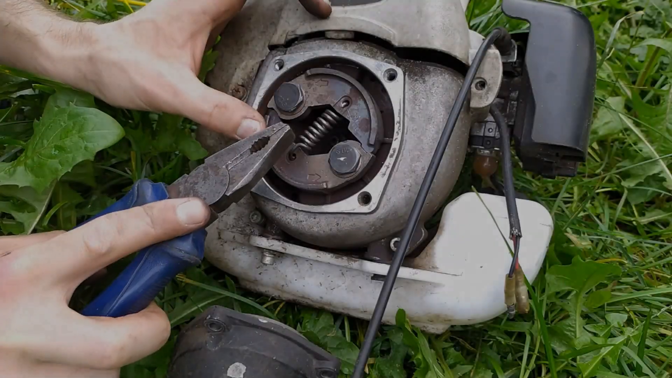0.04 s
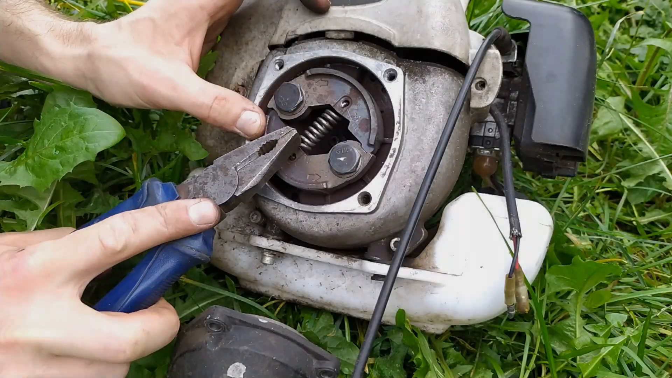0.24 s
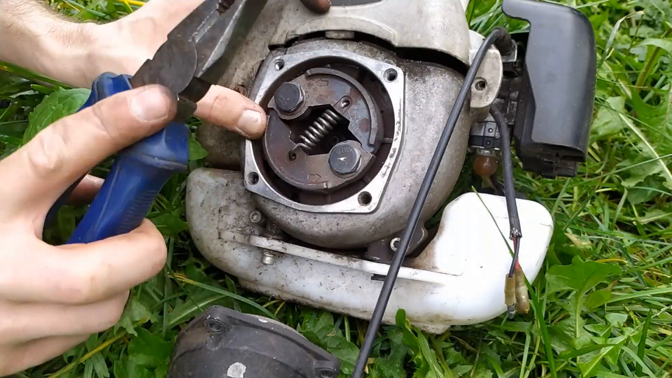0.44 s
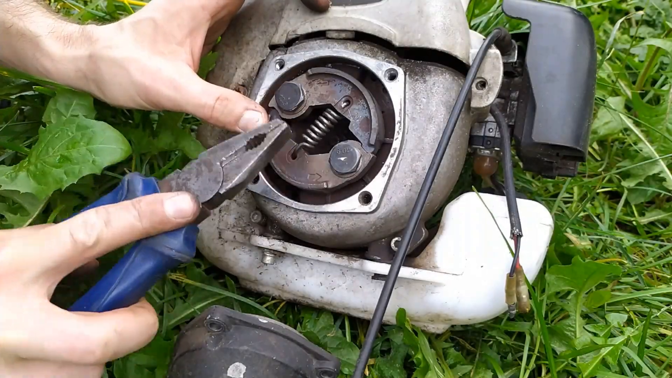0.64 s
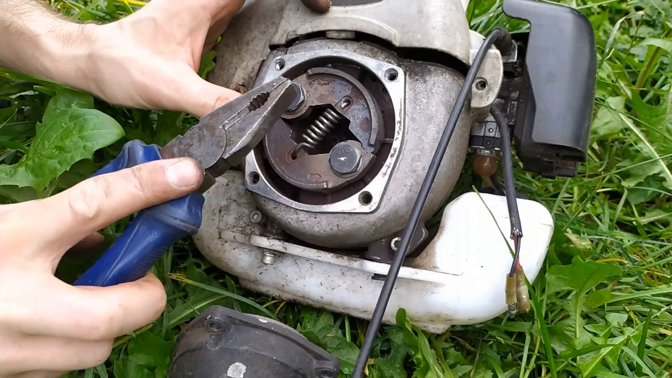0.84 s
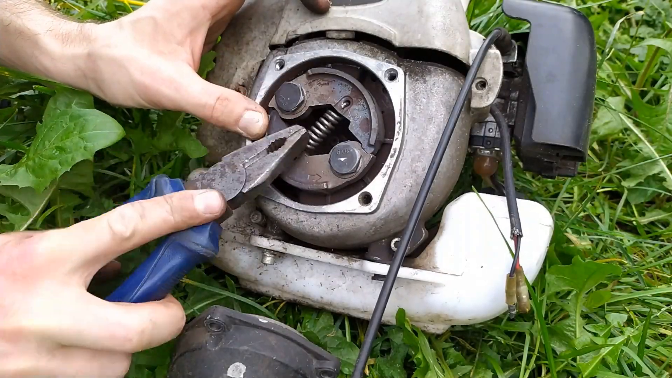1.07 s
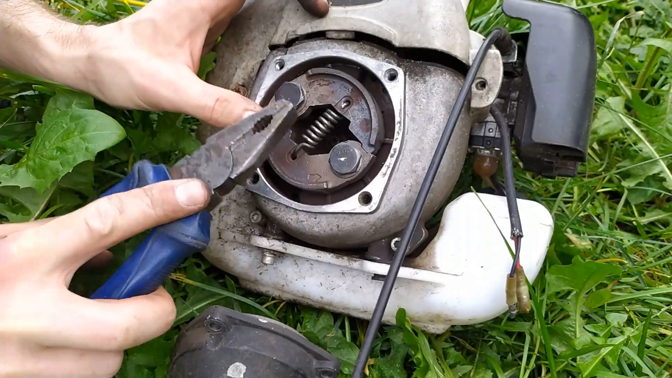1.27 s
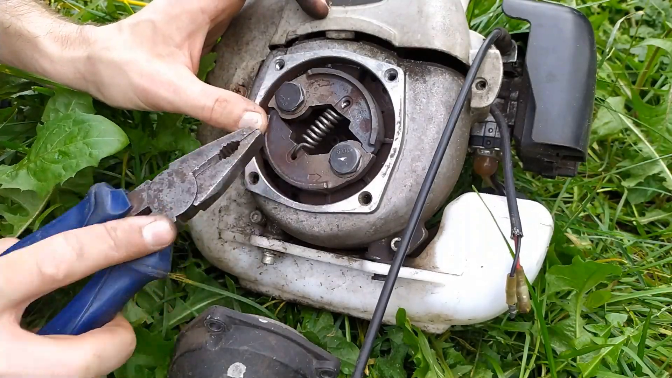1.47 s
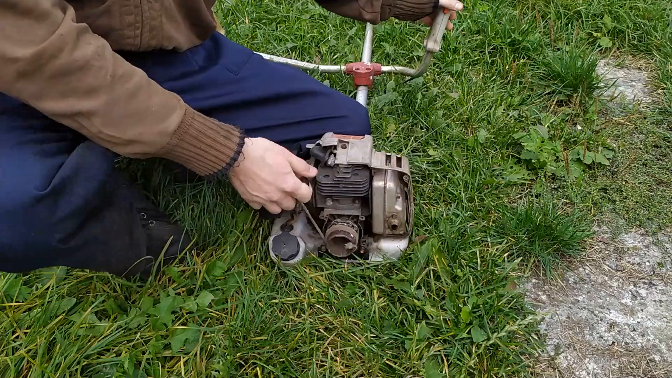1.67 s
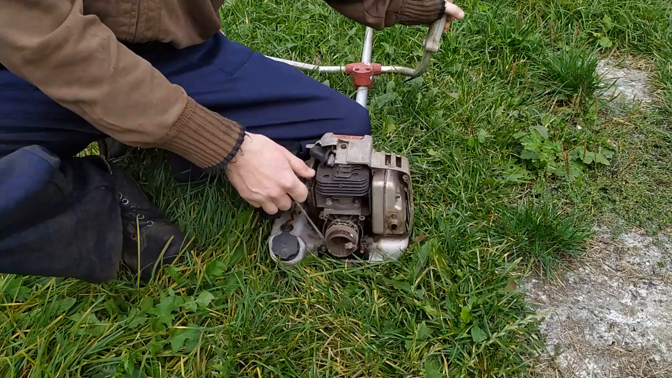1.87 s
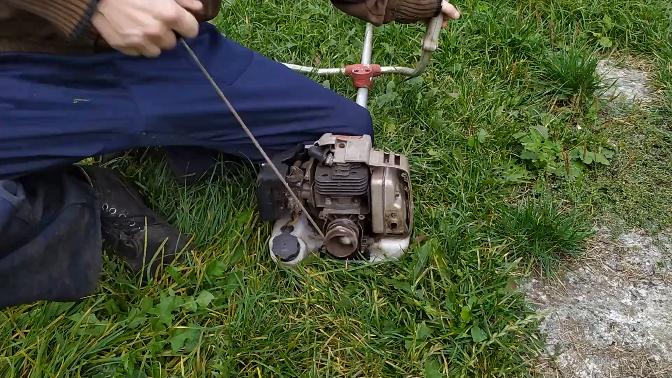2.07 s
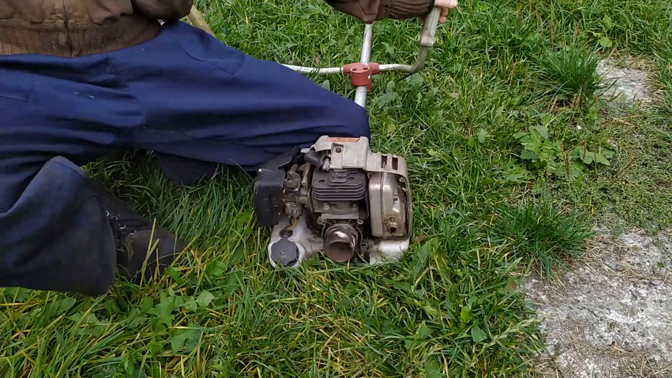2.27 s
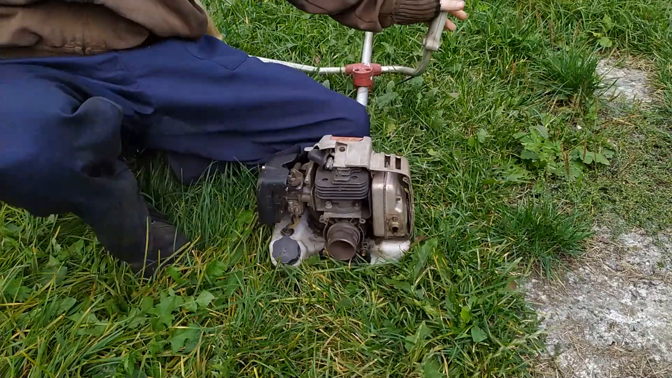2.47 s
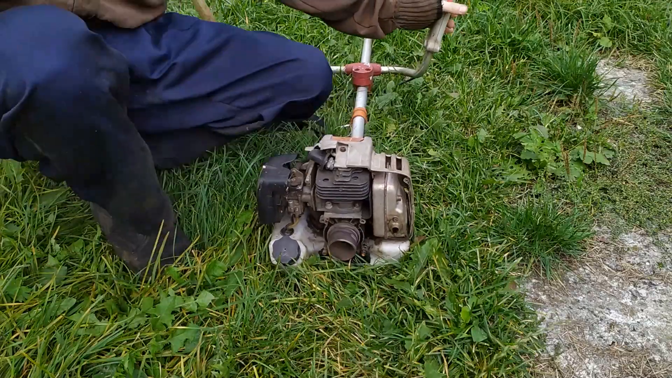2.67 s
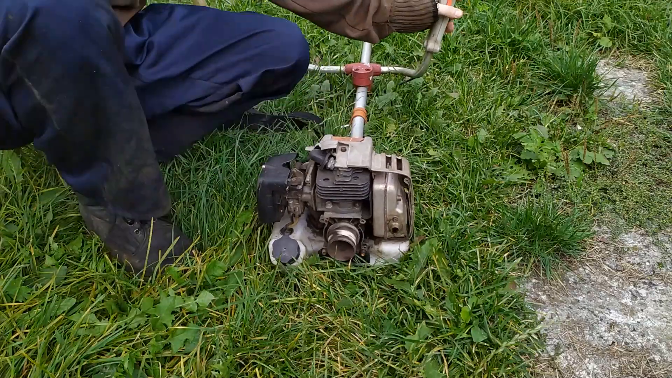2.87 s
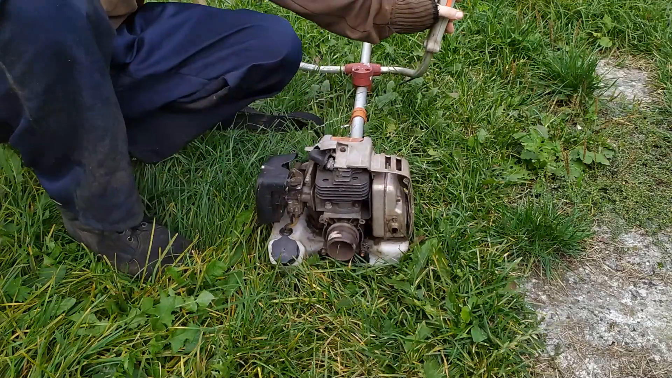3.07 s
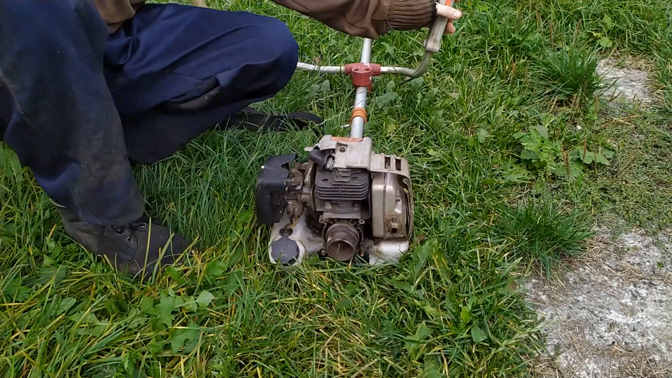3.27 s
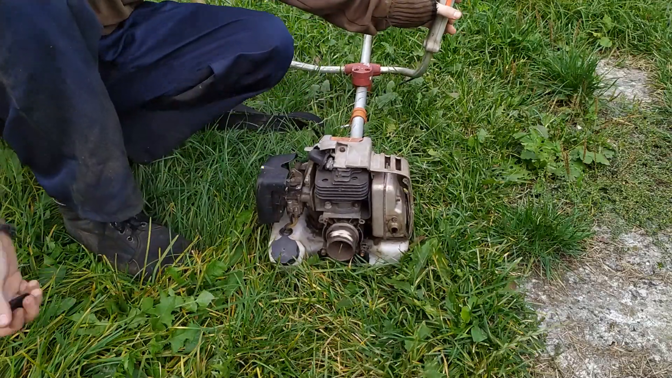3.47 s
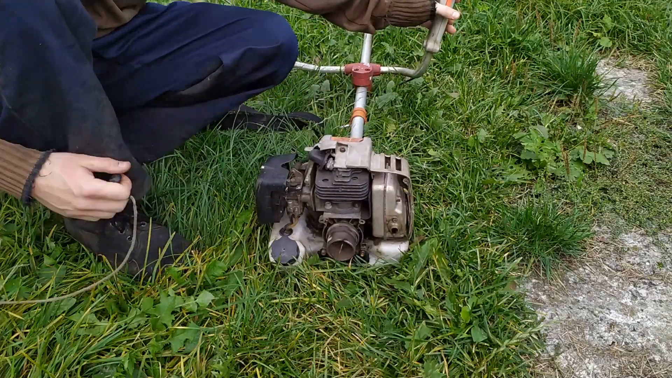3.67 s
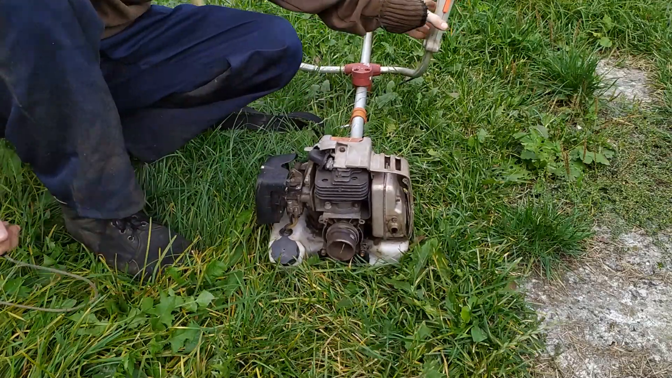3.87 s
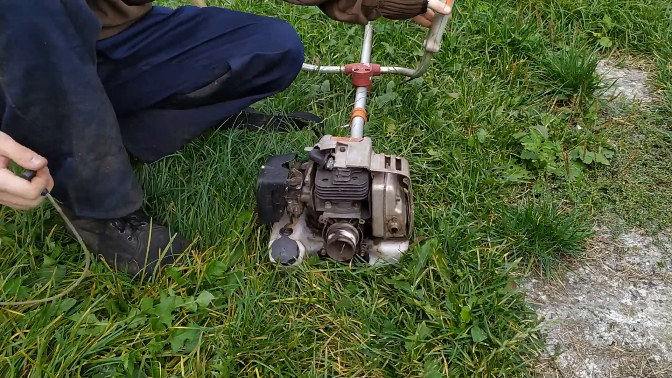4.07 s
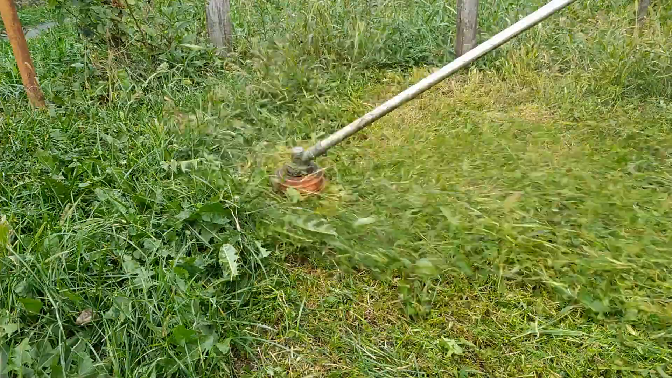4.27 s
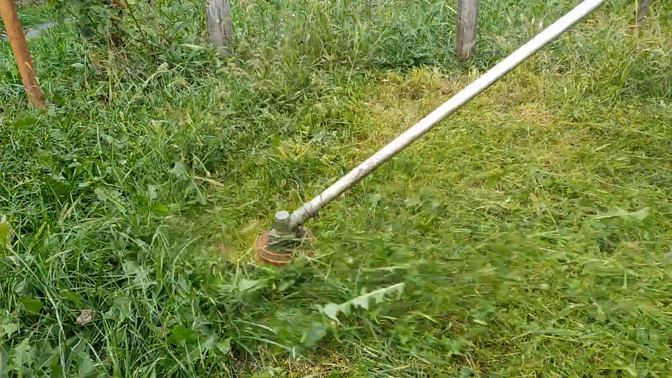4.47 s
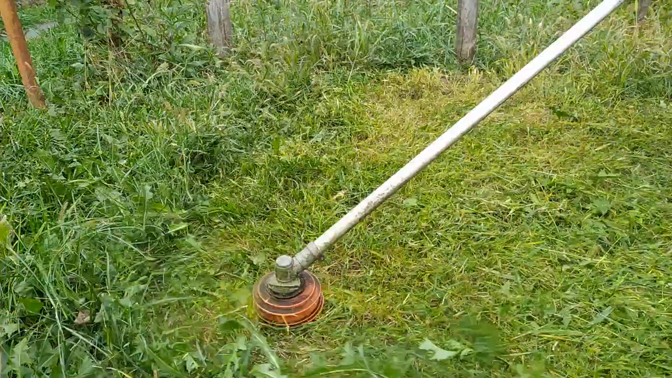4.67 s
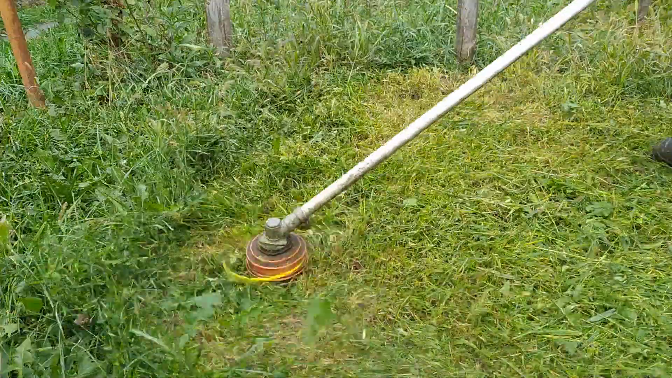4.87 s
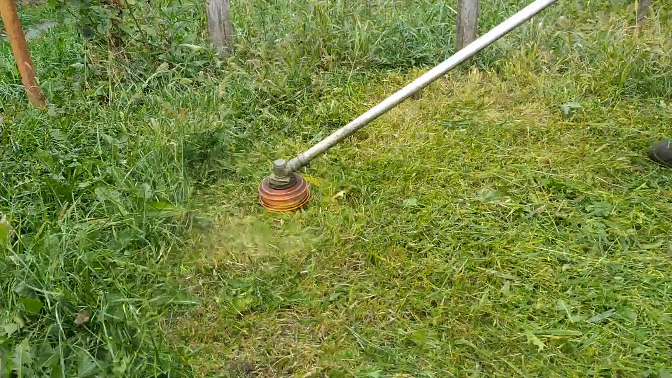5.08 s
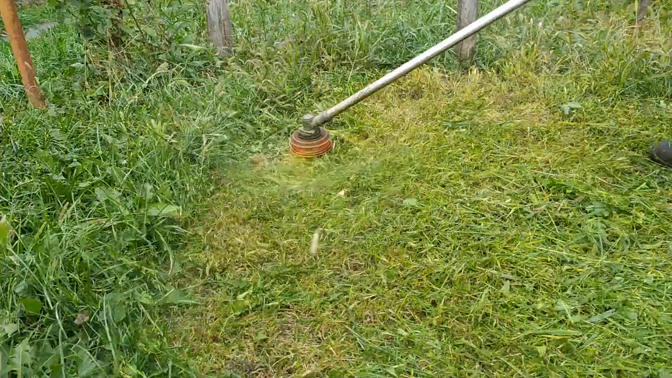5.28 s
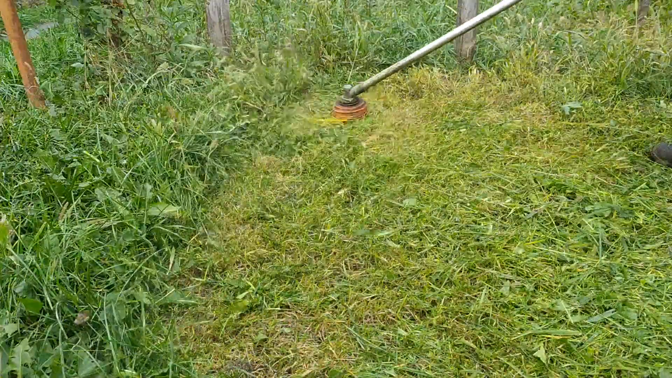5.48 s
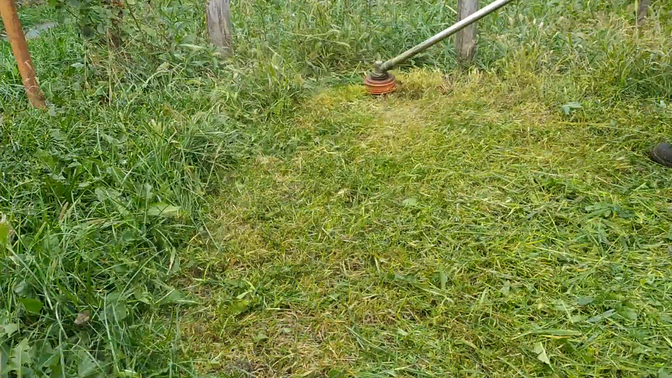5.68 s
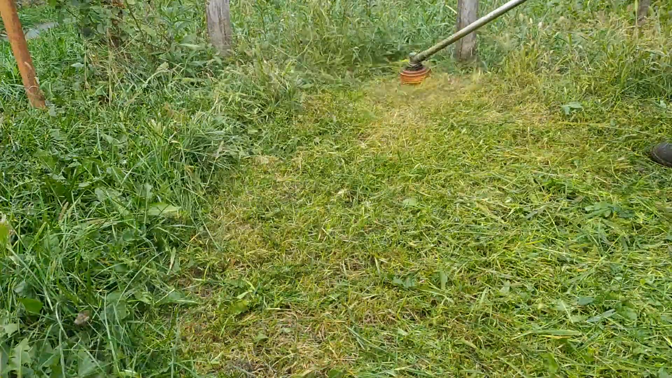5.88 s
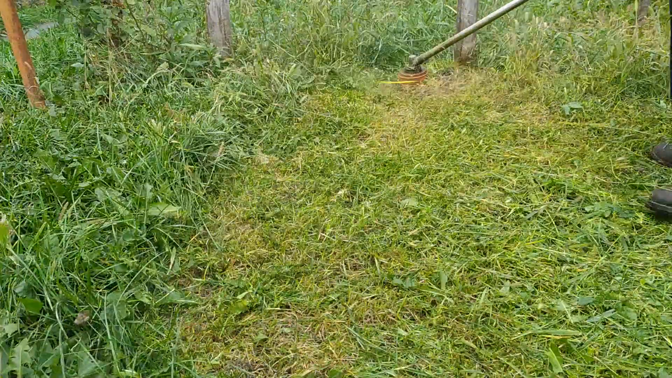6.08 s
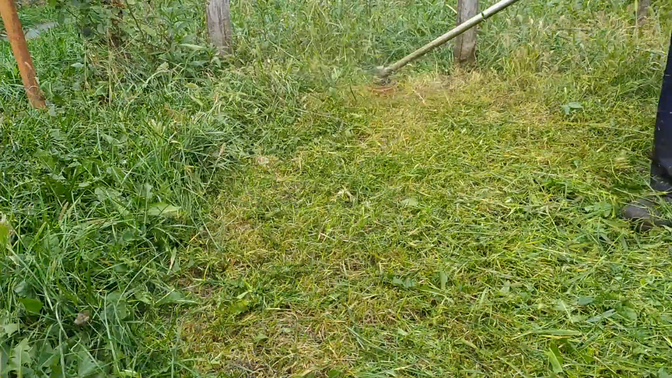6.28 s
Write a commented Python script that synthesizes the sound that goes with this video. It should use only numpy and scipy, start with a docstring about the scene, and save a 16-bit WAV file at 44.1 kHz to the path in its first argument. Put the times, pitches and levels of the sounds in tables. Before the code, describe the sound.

Three dry, open-air moments joined by hard cuts. First, near the microphone, steel clacks and rings as a sprung part snaps back under pliers. Next, a pull cord ratchet clatters and a petrol engine fires, surges briefly, then coasts down through a scraping clutch to a thudding idle with loose metallic rattle. Last, a steady buzzing exhaust drone beneath a wide, bright, fluttering noise of grass being shredded, with plastic guard ticks.

```python
"""A two-stroke engine of a string trimmer: thumps, cracks and rattles timed by its crank, a sum of orders at work.
First pliers lever at its clutch; the sprung shoe snaps back, and struck modes of the steel ring and die.
Then, on a lawn, the engine is pull-started, flares up and settles to an idle that fires every fourth turn.
Last it runs at working speed: the spinning line whirrs and modulates coloured noise as it tears grass."""
import sys
import numpy as np
from scipy import signal
from scipy.fft import rfft, irfft, next_fast_len
from scipy.io import wavfile
from scipy.ndimage import uniform_filter1d

SR = 44100
rng = np.random.default_rng(int(sys.argv[2]) if len(sys.argv) > 2 else 0)


def transcribe(signal):
    """Save signal, clipped to [-1, 1], as a 16-bit WAV file at the path in sys.argv[1]."""
    frames = np.atleast_2d(signal).T
    limited = np.clip(frames, -1, 1)
    pcm = np.round(limited * 32767).astype(np.int16)
    wavfile.write(sys.argv[1], SR, pcm)


N = 279153
T = np.arange(N) / SR  # time in seconds

# Background spectrum of the air. Each row: frequency in Hz, level in dB.
AIR_TONE = [(15, -49), (25, -17), (74, -5.5), (427, -18.5), (624, -21), (734, -20.5), (863, -27.5),
            (1070, -22), (1480, -26.5), (9840, -32.5), (16000, -30)]
AIR_DB = -70
HUM_HZ, HUM_DB = 94, -64
# Stereo width by frequency. Each row: frequency in Hz, side level relative to mid in dB.
WIDTH = [(60, -7), (125, -13), (250, -12.5), (500, -6), (1000, 0), (2000, -1.5), (8000, 0)]
# Narrowing of the start and widening of the mowing. Each row: frequency in Hz, change of the side signal in dB.
START_WIDTH = [(60, 0), (250, -2), (700, -7), (1300, -11.5), (2400, -12), (4400, -2), (8000, -2.5),
               (15000, 2)]
WORK_WIDTH = [(60, 2.5), (250, 2), (700, 2), (1500, 2.5), (2500, 1.5), (5000, 1), (15000, -1)]
LAWN_S, MOWING_S = 1.676, 4.18  # starts of the second and third moments
EDGE_HZ = 15950  # upper band limit

# Snaps of the clutch shoe. Each row: start in seconds, clatter level in dB, clatter decay in seconds, then levels
# in dB of housing knock, crankcase, spring, shoe, pliers, flywheel, pivot bolt and swelling tone,
# delay of its crest in seconds, delay of the rebound in seconds, rebound relative to the clatter in dB.
SNAPS = [(0.2576, -35.5, 0.0056, -36.5, -42, -65.5, -60, -58, -57, -82, -88, .1, 0.0051, -5),
         (0.6436, -9.5, 0.0098, -10.5, -29, -28.5, -28, -36, -35.5, -30.5, -44.5, .11, 0.015, -6.5),
         (1.1812, -13.5, 0.0065, -25, -21, -43, -38, -36, -63, -68.5, -76, .17, 0.019, -9),
         (1.4049, -11.5, 0.0056, -30.5, -35, -39, -50, -28.5, -74, -70, -63.5, .2, 0.0072, -27)]
# Modes of the struck parts. Each row: frequency in Hz, level in dB, 60 dB decay time in seconds.
FLYWHEEL_MODES = [(703, -24, .9), (1206, -15, 0.65), (1458, -7, .95), (1780, -23, 1.3)]
HOUSING_MODES = [(224, -5, 0.084), (278, 1.5, 0.055), (500, -3, 0.029), (660, -7.5, 0.06), (806, 7, 0.02),
                 (896, 6.5, 0.021), (1190, 2, 0.032)]
SPRING_MODES = [(2910, -24, 1.4), (5957, -8, 0.5), (6411, -9, 0.45), (7055, -16, 1.0), (8384, -5.5, .85),
                (8414, -8, .75)]
SHOE_MODES = [(6089, -13, .85), (6158, -9, 0.75), (6718, -12, .28), (6912, 1, .19), (8790, -3, 0.17),
              (11300, -10, .17), (13400, -12, .16)]
PLIERS_MODES = [(3332, -1.5, 0.18), (3402, -17, .28), (4276, -26, 0.6), (5173, -4, .1), (7149, -22, .7),
                (7660, -22, 0.6)]
PIVOT_MODES = [(4840, -4, .15), (6412, 1, .22), (1803, -5, .2)]
PAWL_MODES = [(3230, -6, .15), (3924, 0, .078), (5749, -9, .09), (6939, -15, .11)]
CRANKCASE_MODES = [(1080, -7, .018), (1455, 0, .04), (1720, 2, .016), (2010, -1, .018), (2290, -4, .016),
                   (2850, -7, .018), (6500, -1, .005), (10200, 0, .004)]
STEM_MODES = [(530, -2.3, 0.017), (740, -5, 0.014), (884, 0, 0.023)]
# Cough of the first pull through the silencer. Each row: frequency in Hz, level in dB, 60 dB decay time in seconds.
COUGH_MODES = [(135, -21.5, .085), (200, -28, 0.076)]
COUGH_S = 2.136
# Spectrum of the clatter. Each row: frequency in Hz, level in dB.
CLATTER_TONE = [(200, -1.5), (500, -7), (1000, -11), (1600, -1.5), (2300, -8), (3300, -2), (5200, -7.5),
                (7400, -3.5), (8800, -1), (10800, -13.5), (13500, -7.5), (16000, -19.5)]
CLATTER_PATCHY_DB, CLATTER_UNEVEN_DB = 4.5, 1.8
# A hand shifts on the casing. Each row: time in seconds, level in dB.
HANDLING = [(.36, -88), (.378, -42.5), (.43, -46), (.48, -54), (.55, -59), (.62, -62)]
# Spectrum of the handling. Each row: frequency in Hz, level in dB.
HANDLING_TONE = [(25, -28), (70, 6), (170, -7.5), (300, -13.5), (700, -40), (3000, -50.5), (15000, -49.5)]
# one tone of the steel swells after each snap; each new contact damps what still rings
SWELL_HZ, SWELL_STEEPNESS, CONTACT_DAMP_DB = 4843, 2.6, -18
# the shoe settles in ever weaker taps, relative to the clatter
SETTLE_PER_S, SETTLE_DB, SETTLE_DECAY_S = 130, -23, .028

# Crankshaft speed: pulled over, flaring up, coasting to idle. Each row: time in seconds, turns a second.
CRANK = [(2.13, 27), (2.18, 43.5), (2.33, 44.5), (2.42, 55.6), (2.49, 79.3), (2.55, 91.5), (2.61, 97.3),
         (2.66, 95.9), (2.7, 92.6), (2.76, 86.2), (2.82, 81), (3.0, 68), (3.11, 62.7), (3.36, 58.3),
         (3.62, 54.2), (4.18, 53)]
IDLE_HZ, TURNS_PER_FIRING = 54, 4
TURNING_S, SPIN_UP_S = 2.118, 0.035  # the cord sets the crank turning
# Runs of firings with a stumble between runs. Each row: first and last firing in seconds, thump and crack in dB.
FIRINGS = [(2.17, 2.351, -4, -19.5), (2.82, 2.82, -5.5, -20), (2.962, 3.21, -5, -20),
           (3.2928, 3.8685, -3.8, -21.5), (3.887, 4.037, -6, -22), (4.055, 4.132, -4.5, -21.5)]
THUMP_GAIN_DB, CRACK_GAIN_DB = 0.75, 0.3
# Loose parts clack without a firing. Each row: time in seconds, level in dB.
CLACKS = [(2.408, -21), (2.4427, -17.5), (3.276, -23)]
# Silencer response to a firing, and to unfired charge. Each row: frequency in Hz, level in dB.
THUMP_TONE = [(20, -18), (60, 13.5), (130, 10), (220, 5), (400, -2), (700, -14.5), (1500, -36), (5000, -18)]
PUFF_TONE = [(20, -2), (60, -0.5), (130, 6), (250, 5.5), (450, -4), (800, -18.5), (1500, -40.5),
             (5000, -57)]
PUFF_DB, PUFF_UNDER_FLARE_DB = -23, 1.5  # one puff a turn, stronger during the flare
# The engine shakes most where an order meets its boom. Each row: multiple of crank speed, level in dB, lag in turns.
SHAKE = [(1, -29, 0.71), (2, -32.5, 0.14)]
BOOM_HZ, BOOM_DB_PER_OCTAVE = 97.7, -17
# Rattle of piston and bearings, harder with speed. Each row: frequency in Hz, level in dB.
RATTLE_TONE = [(30, 0), (120, 14.5), (300, 11), (550, 11), (800, 2.5), (1100, 5.5), (1750, 9), (2400, 7),
               (3000, 5), (5000, 2.5), (7000, 3.5), (10000, 1), (12000, -3.5), (16000, -3.5)]
RATTLE_DB, RATTLE_DB_PER_OCTAVE = -34.5, 9
# the piston slaps harder with speed; loose parts tick at random
SLAP_DB, SLAP_DB_PER_OCTAVE, SLAP_UNEVEN_DB = -40, 15, 2.5
TICK_DB, TICK_UNEVEN_DB, TICKS_PER_S = -46, 4, 90

# Overtones of the flare. Each row: multiple of the crank speed, level in dB.
FLARE_ORDERS = [(1, 6.5), (2, -6.5), (3, 1.5), (4, -7), (5, -6), (6, -10), (7, -7.5), (8, -8.5), (9, -16),
                (11, -22), (15, -21), (17, -18), (20, -21), (23, -22), (28, -33)]
FLARE_S, FLARE_RISE_S = 2.36, 0.022  # the starting charge catches
# As the charge runs out the rasp begins a long fade, the overtones drop quickly, then the boom stops;
# the rasp ends last. Each holds: level in dB, end of the hold in seconds, release in seconds.
FLARE_BARK = (-20, 2.635, 0.037)
FLARE_RASP = (-28.5, 2.615, 0.21)
FLARE_BOOM = (-31, 2.69, 0.028)
FLARE_DB_PER_OCTAVE = 7.5  # the boom grows with speed
# Spectrum of the rasping gas. Each row: frequency in Hz, level in dB.
RASP_TONE = [(100, -2), (700, -3), (1500, -12), (4500, -3), (6800, 3), (8500, -2.5), (10000, 1.5),
             (12000, -4.5), (16000, -6.5)]
# Silencer resonances. Each row: frequency in Hz, width in Hz, gain in dB.
SILENCER = [(620, 47, 1), (704, 30, -0.5), (1410, 34, -8), (1820, 150, -35)]

# Pawls of the pull starter catch and clatter. Each row: time in seconds, level in dB, decay in seconds.
PAWLS = [(1.939, -62.5, 0.0029), (2.032, -48.5, 0.012), (2.1, -38, 0.0053), (2.113, -30, 0.0032),
         (2.118, -25, 0.0027), (2.16, -20.5, 0.01), (2.2076, -27, 0.0025), (2.23, -32, 0.0032),
         (2.3197, -22.5, 0.0039), (2.4187, -17.5, .005)]
# Spectrum of the pawls. Each row: frequency in Hz, level in dB.
PAWL_TONE = [(300, -0.5), (1000, -17), (1600, -0.5), (2400, -2), (3200, 6), (4200, 6.5), (5400, -0.5),
             (7300, 0.5), (10000, -10.5), (13000, -9), (16000, -16)]
PAWL_RING_DB, PAWL_RING_MAX_DB = -9, -38  # relative to the blow, and ceiling
# then they skip once a turn, just ahead of the piston
SKIP_FROM_S, SKIP_TO_S = 2.18, 2.36
SKIP_DB, SKIP_DECAY_S, SKIP_LEAD_S = -27.5, 0.0054, 0.0055
# Brief scrapes of starter and clutch shoes. Each row: start in seconds, length in seconds, level in dB.
SCRAPES = [(2.151, 0.033, -30.5), (3.793, 0.011, -27), (3.957, 0.0057, -27), (4.13, 0.0062, -26)]
# Spectrum of the scrapes. Each row: frequency in Hz, level in dB.
SCRAPE_TONE = [(300, 4), (1000, -15), (1600, 2), (2300, -6), (3200, 6.5), (5000, 0.5), (7500, 0),
               (10000, 1), (13000, -3.5), (16000, -7)]
SCRAPE_RISE_S, SCRAPE_FALL_S = 0.0024, 0.021
# the coasting clutch drags around the speed at which it lets go; the drive sings roughly until then
CLUTCH_HZ, CLUTCH_SPREAD_HZ, DRAG_DB = 72.8, 5.2, -25
WHINE_HZ, WHINE_WIDTH_HZ, WHINE_DB = 1014, 330, -39
WHINE_FROM_S, WHINE_RISE_S, WHINE_ROUGH = 2.69, .05, .75  # roughness: noise share of the driving power

# The engine at work. Each row: time in seconds, turns a second.
WORK_SPEED = [(4.2, 91.7), (4.54, 92.0), (4.58, 90.3), (4.69, 92.1), (4.84, 93.0), (5.01, 91.1),
              (5.23, 92.2), (5.38, 91.3), (5.47, 92.1), (5.91, 92.1), (6.01, 91.1), (6.33, 91.6)]
WORK_DB = -30  # fundamental of its exhaust note
# Overtones of the exhaust at work. Each row: multiple of the crank speed, level in dB.
WORK_ORDERS = [(2, -4), (3, -7), (4, 0), (5, 7), (6, 8), (7, -2), (8, 1.5), (9, -7), (10, -1), (11, 2.5),
               (12, -5), (13, -10), (14, -.5), (15, -5), (16, -13)]
# Level of those overtones as the machine is swung about. Each row: time in seconds, level in dB.
WORK_OVERTONES = [(4.18, -48.5), (4.5, -46.5), (5.35, -49.5), (5.65, -43), (6.33, -41.5)]
# Gas rasps out at every turn of the working engine. Each row: frequency in Hz, level in dB.
EXHAUST_HISS_TONE = [(300, -12), (900, -2), (1600, 1), (2600, 0), (4000, -3), (6500, -7), (16000, -30)]
EXHAUST_HISS_DB, EXHAUST_BURST_TURNS = -41, .2

# The cutting line, slowed by thick grass. Each row: time in seconds, passes a second.
LINE = [(4.18, 121), (4.45, 116), (4.53, 112), (4.63, 116), (4.85, 113), (5.15, 116), (5.6, 114),
        (5.8, 128), (5.92, 128), (6.15, 120), (6.33, 116)]
# Loudness of the shredding, and of the nearly steady swish. Each row: time in seconds, level in dB.
SHREDDING = [(4.2, -27), (4.62, -24.5), (4.88, -24), (5.05, -27.5), (5.42, -25.5), (5.58, -31), (5.92, -26),
             (6.33, -30)]
SWISH = [(4.18, -29.5), (5.35, -31), (5.6, -30), (6.33, -30.5)]
# Whirr of the line, which thick grass chokes. Each row: time in seconds, level in dB.
WHIRR = [(4.18, -31), (4.45, -27), (4.53, -38), (4.68, -32), (5.0, -36), (5.25, -34), (5.6, -43),
         (5.87, -32), (6.15, -47)]
WHIRR_WAVER_DB = 1.5
# Bites into thick tufts, which buffet the air. Each row: time in seconds, level in dB.
TUFTS = [(4.25, -32.5), (4.45, -30), (4.72, -27), (4.93, -29.5), (5.18, -26.5), (5.41, -28.5),
         (5.95, -30.5), (6.3, -28.5)]
TUFT_S, BUFFET_DB, GUSTY_DB = 0.096, -36, 1.6  # half-length of a bite; steady buffeting; its unevenness
# The line thwacks through thick stems. Each row: time in seconds, level in dB.
THWACKS = [(4.251, -25), (4.303, -21.5), (4.457, -20.5)]
# unevenness of the tearing under full load: pass by pass, blade by blade, clump by clump; and in colour
PASS_DB, BLADES_DB, CLUMPS_DB, SHRED_PATCHY_DB = 2.2, 1.4, .7, 1.7
# Spectra of shredding, swish and buffeting. Each row: frequency in Hz, level in dB.
SHRED_TONE = [(1500, -3.5), (3000, -21), (4500, -1.5), (6000, 0.5), (7300, 2.5), (9500, 3.5), (12000, 1),
              (16000, 0)]
SWISH_TONE = [(200, 1), (500, 2.5), (800, -0.5), (1200, -2.5), (1700, -5), (2600, -2.5), (4000, -5),
              (8000, -10), (16000, -31)]
BUFFET_TONE = [(20, -44), (50, -5), (90, 11.5), (200, 8), (320, 5.5), (500, -2), (900, 0.5), (3000, -86)]
# Resonances of the plastic guard. Each row: frequency in Hz, gain in dB.
GUARD = [(6200, 15.5), (7330, 17.5), (8300, -12), (12370, -15)]


def amp(db):
    """Converts decibels to an amplitude ratio."""
    return 10 ** (np.asarray(db) / 20)


def unit(x):
    """Normalises to a root-mean-square of 1."""
    return x / np.sqrt(np.mean(x ** 2) + 1e-20)


def curves(rows):
    """Linear interpolation of each column of a time table, at every sample."""
    s, *columns = np.transpose(rows)
    return [np.interp(T, s, c) for c in columns]


def read(points, hz):
    """A spectrum's gain, interpolated in decibels over log frequency."""
    f, db = np.transpose(points)
    return amp(np.interp(np.log(hz + 1), np.log(f + 1), db))


def add(mix, s, sound):
    """Superposition: adds a sound into the mix at time s."""
    part = mix[..., round(s * SR):][..., :sound.shape[-1]]
    part += sound[..., :part.shape[-1]]


def held(start, rise_s, end, release_s):
    """A linear envelope: attack, hold, release."""
    return np.clip((T - start) / rise_s, 0, 1) * np.clip(1 - (T - end) / release_s, 0, 1)


def noise(tone):
    """Spectrally shaped stereo noise, narrow in the bass and wide in the treble."""
    size = next_fast_len(N)
    hz = np.fft.rfftfreq(size, 1 / SR)
    z = rfft(rng.standard_normal((2, size))) * read(tone, hz)
    mid, side = irfft(z[0])[:N], irfft(z[1] * read(WIDTH, hz))[:N]
    return np.array([mid + side, mid - side]) / mid.std()


def wander(hz, size=16384):
    """Low-passed random fluctuation of rms 1, moving up to about hz times a second."""
    low_pass = np.exp(-(np.fft.rfftfreq(size, T[-1] / size) / hz) ** 2)
    slow = irfft(rfft(rng.standard_normal(size)) * low_pass)
    return np.interp(T, np.linspace(0, T[-1], size), unit(slow))


def patchy(x, depth_db, size=512):
    """Time-varying filtering: the colour of a noise shifts in small patches of time and frequency."""
    z = signal.stft(x, nperseg=size)[2]
    smooth = uniform_filter1d(rng.standard_normal(z.shape[1:]), size=9, axis=0)
    patches = unit(uniform_filter1d(smooth, size=3, axis=1))
    return signal.istft(z * unit(amp(depth_db * patches)), nperseg=size)[1][:, :N]


def causal(gain):
    """Minimum phase: the promptest pulse that has this magnitude spectrum."""
    log_gain = np.log(np.maximum(gain, 1e-5))
    mirrored = np.r_[log_gain, log_gain[-2:0:-1]]
    return np.fft.ifft(np.exp(np.conj(signal.hilbert(mirrored)))).real


def pulse(tone, size=4096):
    """A minimum-phase pressure pulse of peak 1 with the given spectrum."""
    shape = causal(read(tone, np.fft.rfftfreq(size, 1 / SR)))
    return shape / abs(shape).max()


def resonate(x, hz, width_hz):
    """A second-order resonance, of gain 1 at its centre."""
    return signal.lfilter(*signal.iirpeak(hz, hz / width_hz, fs=SR), x)


def ring(modes, beat_db=-14, max_beat_hz=9):
    """Modal decay of a struck body; each mode beats and reaches the two ears out of phase."""
    t, sides, out = T[:2 * SR], np.array([[1], [-1]]) * np.pi / 4, 0
    chances = rng.uniform(-1, 1, (len(modes), 2))
    for (lag, split), (hz, db, t60) in zip(chances, modes):
        beat = 1 + amp(beat_db) * np.sin(2 * np.pi * split * max_beat_hz * t)
        ear_phase = sides * np.sign(lag) * read(WIDTH, hz)
        out = out + amp(db - 60 * t / t60) * beat * np.sin(2 * np.pi * hz * t + ear_phase)
    return out


def jangle(tone, t60, count=84):
    """Dense modes of small steel parts, crowded low in frequency, with spread decays and different in each ear."""
    t, (place, phase, life) = T[:SR // 3], rng.random((3, 2, count, 1))
    hz = 600 + 14400 * ((np.arange(count)[:, None] + place) / count) ** 1.5
    decay = amp(-60 * t / (t60 * 3 ** (life - .5)))
    modes = read(tone, hz) * np.sin(2 * np.pi * (hz * t + phase)) * decay
    return modes.sum(1) / np.sqrt(count)


def each_turn(turns, length, rest):
    """Periodic modulation: a burst at the start of every turn, over a steady rest."""
    return unit(abs(rest) + np.exp(-(turns % 1) / length))


def turn_clicks(turns):
    """An impulse train: one unit impulse at every whole turn."""
    return np.r_[0, np.diff(np.floor(turns))]


def widened(x, width):
    """Mid-side processing: narrows or widens a stereo sound, band by band."""
    size = next_fast_len(N)
    gain = read(width, np.fft.rfftfreq(size, 1 / SR))
    side = irfft(rfft((x[0] - x[1]) / 2, size) * gain, size)[:N]
    return x.mean(0) + np.array([side, -side])


def background_air(lawn):
    """Stationary coloured noise, 2 dB weaker from the lawn on."""
    return amp(AIR_DB - 2 * lawn) * noise(AIR_TONE)


def hum():
    """A steady pure tone, its level given as rms."""
    return amp(HUM_DB) * np.sqrt(2) * np.sin(2 * np.pi * HUM_HZ * T)


def clutch(rise=0.0015, jangle_db=-5, jangle_t60=0.1, rock_hz=56, rock_db=-22, rock_t60=0.15):
    """Impact excitation: the shoe slips off the pliers, clatters home, rebounds, settles; the steel rings on."""
    out, ringing, t = np.zeros((2, N)), np.zeros((2, N)), T[:SR]
    grit = patchy(noise(CLATTER_TONE), CLATTER_PATCHY_DB) * unit(amp(CLATTER_UNEVEN_DB * wander(500)))
    ringing_parts = (SPRING_MODES, SHOE_MODES, PLIERS_MODES, FLYWHEEL_MODES, PIVOT_MODES)
    for s, db, decay, knock_db, case_db, *ring_db, swell_db, crest, later, rebound_db in SNAPS:
        blow, strength = (1 - np.exp(-t / rise)) * np.exp(-t / decay), np.zeros(N)
        taps = (rng.random(SR) < SETTLE_PER_S / SR) * amp(db + SETTLE_DB) * np.exp(-t / SETTLE_DECAY_S)
        for after, blow_db in ((0, db), (later, db + rebound_db)):
            add(strength, s + after, amp(blow_db) * blow)
            taps[round(after * SR)] += amp(blow_db + jangle_db)
        out += strength * grit
        small_parts = jangle(CLATTER_TONE, jangle_t60)
        add(out, s + 0.0014, signal.oaconvolve(taps[None], small_parts, axes=1))
        ringing *= amp(CONTACT_DAMP_DB * np.clip((T - s) / decay, 0, 1))
        for part, part_db in zip(ringing_parts, ring_db):
            add(ringing, s, amp(part_db) * ring(part))
        swell = (t / crest * np.exp(1 - t / crest)) ** SWELL_STEEPNESS
        ear_phase = np.array([[1], [-1]]) * np.pi / 6
        add(ringing, s, amp(swell_db) * swell * np.sin(2 * np.pi * SWELL_HZ * t + ear_phase))
        knock = amp(knock_db) * ring(HOUSING_MODES) + amp(case_db) * ring(CRANKCASE_MODES)
        add(out, s + .002, knock[:, :SR] * (1 - np.exp(-t / 0.0044)))
        # the whole engine rocks on the turf
        rock = amp(rock_db + db) * ring([(rock_hz, 0, rock_t60)])[:, :SR]
        add(out, s + 0.011, rock * (1 - np.exp(-t / .012)))
    handling = amp(curves(HANDLING)[0]) * noise(HANDLING_TONE)
    return (out + ringing + handling) * amp([[-.7], [.7]])  # slightly to the right


def flung_bits(per_s=45, width_hz=450, db=-8):
    """Random impacts: flung bits of stalk tick against the guard, each exciting one of its resonances."""
    out = 0
    for hz, gain_db in GUARD:
        force = amp(5 * np.minimum(rng.exponential(1, (2, N)), 2.5))
        hits = (rng.random((2, N)) < per_s / SR) * force
        out = out + amp(gain_db) * resonate(hits, hz, width_hz)
    return amp(curves(SHREDDING)[0] + db) * unit(out)


def cutting_line(octave_db=-7, stalks_per_s=420, stalk_db=-7.5, stalk_s=0.0004):
    """Rotational tone and modulated noise: the line whirrs, tears grass unevenly and snaps thick stalks."""
    passes, shredding_db = np.cumsum(curves(LINE)[0]) / SR, curves(SHREDDING)[0]
    angle, load = 2 * np.pi * passes, amp(shredding_db - shredding_db.max())
    torn_db = PASS_DB * np.cos(angle) + BLADES_DB * wander(260) + CLUMPS_DB * wander(35)
    passing = unit(amp(load * torn_db))
    whirr_level = amp(curves(WHIRR)[0] + WHIRR_WAVER_DB * wander(6))
    whirr = whirr_level * (np.cos(angle) + amp(octave_db) * np.cos(2 * angle))
    # stalk rate per second is the mean before the passing modulation
    force = amp(2.0 * np.minimum(rng.exponential(1, N), 2))
    stalks = (rng.random(N) < passing * stalks_per_s / SR) * force
    snaps = amp(stalk_db) * unit(signal.lfilter([1], [1, -np.exp(-1 / (stalk_s * SR))], stalks))
    tearing = np.hypot(passing, snaps)
    shred = amp(shredding_db - 0.5) * tearing * noise(SHRED_TONE)
    swish = amp(curves(SWISH)[0] + 0.32 * wander(51)) * unit(tearing) * noise(SWISH_TONE)
    bites = sum(amp(db) * np.exp(-((T - s) / TUFT_S) ** 2) for s, db in TUFTS)
    gusts = amp(-5.0 + GUSTY_DB * wander(27))
    buffet = np.hypot(amp(BUFFET_DB), bites) * gusts * noise(BUFFET_TONE)
    out = whirr + patchy(shred + swish, SHRED_PATCHY_DB) + buffet
    for s, db in THWACKS:
        add(out, s, amp(db) * ring(STEM_MODES))
    return out


def crank_speed():
    """Rate of rotation in turns a second, at every sample."""
    return curves(CRANK)[0]


def crank_turns():
    """Integral of crank speed, adjusted so that runs of firings start and end whole turns apart."""
    turns, s = np.cumsum(crank_speed()) / SR, np.unique([row[:2] for row in FIRINGS])
    at = np.interp(s, T, turns)
    whole = np.r_[0, np.cumsum(np.round(np.diff(at)))]
    return turns + np.interp(T, s, whole - at)


def turn_times(turns, first_s, last_s, step=1):
    """Inversion of phase: the moments of every step-th whole turn between two times."""
    first, last = np.round(np.interp([first_s, last_s], T, turns))
    return np.interp(np.arange(first, last + 1, step), turns, T)


def spinning():
    """A linear onset as the cord sets the crank turning."""
    return np.clip((T - TURNING_S) / SPIN_UP_S, 0, 1)


def starter(turns, jangle_db=-8, jangle_t60=0.07):
    """Ratchet impacts: the pawls catch and then skip as the engine overtakes the cord."""
    strength, out, t = np.zeros(N), np.zeros((2, N)), T[:SR // 10]
    skips = [(s - SKIP_LEAD_S, SKIP_DB + rng.standard_normal(), SKIP_DECAY_S)
             for s in turn_times(turns, SKIP_FROM_S, SKIP_TO_S)]
    parts, pawl = jangle(PAWL_TONE, jangle_t60), ring(PAWL_MODES)
    for s, db, decay in list(PAWLS) + skips:
        add(strength, s, amp(db) * (1 - np.exp(-t / 0.00061)) * np.exp(-t / decay))
        add(out, s, amp(db + jangle_db) * parts)
    for s, db, decay in PAWLS:
        add(out, s, amp(min(db + PAWL_RING_DB, PAWL_RING_MAX_DB)) * pawl)
    return out + strength * patchy(noise(PAWL_TONE), CLATTER_PATCHY_DB)


def dragging(turns, waver_db=2.5, bite_turns=.3, steady_rub=1.0):
    """Friction: the coasting drive whines until the clutch lets go in a chattering scrape; shoes later graze the drum."""
    coasting = np.clip((T - WHINE_FROM_S) / WHINE_RISE_S, 0, 1)
    slip = (crank_speed() - CLUTCH_HZ) / CLUTCH_SPREAD_HZ
    rub = amp(DRAG_DB) * coasting * np.exp(-slip ** 4) * each_turn(turns, bite_turns, steady_rub)
    for s, length, db in SCRAPES:
        rub = rub + amp(db) * held(s, SCRAPE_RISE_S, s + length, SCRAPE_FALL_S)
    scrape = rub * amp(0.84 * wander(280)) * noise(SCRAPE_TONE)
    knocks = unit(turn_clicks(turns))
    drive = np.sqrt(1 - WHINE_ROUGH) * knocks + np.sqrt(WHINE_ROUGH) * rng.standard_normal((2, N))
    once = resonate(drive, WHINE_HZ, WHINE_WIDTH_HZ)
    whine = unit(resonate(once, WHINE_HZ, WHINE_WIDTH_HZ))
    engaged = coasting * np.exp(-np.minimum(slip, 0) ** 2)
    return scrape + engaged * whine * amp(WHINE_DB + waver_db * np.array([wander(60), wander(60)]))


def knocking(turns):
    """Impulse response: the piston's slap at each turn and random ticks of loose parts ring the crankcase."""
    octaves = np.log2(crank_speed() / IDLE_HZ)
    slap_db = SLAP_DB + SLAP_DB_PER_OCTAVE * octaves + SLAP_UNEVEN_DB * wander(60)
    slaps = turn_clicks(turns) * amp(slap_db)
    tick_db = TICK_DB + TICK_UNEVEN_DB * np.minimum(rng.exponential(1, (2, N)), 2)
    ticks = (rng.random((2, N)) < TICKS_PER_S / SR) * amp(tick_db)
    body = ring(CRANKCASE_MODES)[:, :SR // 10]
    return signal.oaconvolve(slaps + ticks, body, axes=1)[:, :N] * spinning()


def idle(turns, wheel_hz=1460, wheel_db=-11, wheel_width_hz=20, uneven_db=0.5):
    """Periodic forcing: the piston pumps and shakes the engine each turn; bearings rattle, the flywheel sings."""
    speed = crank_speed()
    puff_db = PUFF_DB + PUFF_UNDER_FLARE_DB * flaring(0, *FLARE_BOOM[1:]) + uneven_db * wander(40)
    puffs = signal.oaconvolve(turn_clicks(turns) * amp(puff_db), pulse(PUFF_TONE))[:N]
    shake = 0
    for order, db, lag in SHAKE:
        detuning = abs(np.log2(order * speed / BOOM_HZ))  # octaves away from the boom
        shake = shake + amp(db + BOOM_DB_PER_OCTAVE * detuning) * np.cos(2 * np.pi * order * (turns - lag))
    # a narrow random band, drawn separately for each ear
    carrier = np.exp(2j * np.pi * wheel_hz * T)
    singing = np.array([((wander(wheel_width_hz) + 1j * wander(wheel_width_hz)) * carrier).real
                        for ear in range(2)])
    rattle_db = RATTLE_DB + RATTLE_DB_PER_OCTAVE * np.log2(speed / IDLE_HZ) + 1.24 * wander(86)
    rattle = each_turn(turns, .25, 22.0) * noise(RATTLE_TONE) + amp(wheel_db) * singing
    return (puffs + np.sqrt(2) * shake + amp(rattle_db) * rattle) * spinning()


def flaring(db, until_s, release_s):
    """Envelope of one part of the flare."""
    return amp(db) * held(FLARE_S, FLARE_RISE_S, until_s, release_s)


def flare(turns, uneven=0.075, lead=0.121, ringing_db=11, size=512):
    """Harmonic series: firing every turn on the rich charge, a boom, a bark, a ringing silencer and a rasp of gas."""
    order, order_db = np.transpose([(0, -20)] + list(FLARE_ORDERS) + [(60, -102)])
    orders = np.arange(size // 2 + 1)
    shape = unit(causal(amp(np.interp(orders, order, order_db))))
    wave = irfft(rfft(shape) * (orders > 1))  # one turn without its fundamental
    overtones = np.interp(turns + lead, np.arange(size) / size, wave, period=1)
    bangs = unit(turn_clicks(turns + lead))
    ringing = amp(ringing_db) * sum(amp(gain_db) * resonate(bangs, hz, width) for hz, width, gain_db in SILENCER)
    swing = np.sqrt(2) * np.cos(2 * np.pi * (turns - SHAKE[0][2]))
    boom = flaring(*FLARE_BOOM) * amp(FLARE_DB_PER_OCTAVE * np.log2(crank_speed() / IDLE_HZ)) * swing
    bark = flaring(*FLARE_BARK) * (overtones + ringing) * (1 + uneven * wander(100))
    rasp = flaring(*FLARE_RASP) * each_turn(turns, 0.27, 0.09) * noise(RASP_TONE)
    return boom + rasp - bark


def firings(turns, crack_s=0.0035, chatter_db=-13, chatter_s=0.0063, lag=0.00069, uneven_db=.5):
    """Combustion pulses: each firing thumps through the silencer, cracks, and jolts loose parts."""
    out, crack, t = np.zeros(N), np.zeros(N), T[:SR // 10]
    thump = pulse(THUMP_TONE)
    decay = np.exp(-t / crack_s) + amp(chatter_db) * np.exp(-t / chatter_s)
    jolt = (1 - np.exp(-t / 0.00088)) * decay
    for first, last, thump_db, crack_db in FIRINGS:
        for s in turn_times(turns, first, last, TURNS_PER_FIRING):
            charge_db = uneven_db * rng.standard_normal()
            add(out, s + lag, -amp(thump_db + charge_db) * thump)
            add(crack, s, amp(crack_db + charge_db) * jolt)
    for s, db in CLACKS:
        add(crack, s, amp(db) * jolt)
    crack_tone = [(300, -35), (1500, 11.0), (3500, 8), (5000, 5.0), (7000, 13.0), (10500, 9.0),
                  (13000, 3.0), (16000, -7.5)]  # Hz, dB
    return amp(THUMP_GAIN_DB) * out + amp(CRACK_GAIN_DB) * crack * noise(crack_tone)


def working_engine(waver=.12, phase_drift=.06, spread=.7):
    """Harmonic synthesis: a steady, rasping exhaust note, its overtones wavering as the machine is swung about."""
    hz = curves(WORK_SPEED)[0]
    turns, upper = np.cumsum(hz) / SR, np.zeros((2, N))
    angle = 2 * np.pi * turns
    for order, db in WORK_ORDERS:
        apart = np.array([[1], [-1]]) * read(WIDTH, order * hz.mean()) * spread * wander(2.3)
        phase = order * angle + phase_drift * wander(3.7) + apart
        upper += amp(db) * (1 + waver * wander(1.7)) * np.cos(phase)
    rasp = amp(EXHAUST_HISS_DB) * each_turn(turns, EXHAUST_BURST_TURNS, 0) * noise(EXHAUST_HISS_TONE)
    note = amp(WORK_DB) * np.cos(angle) + amp(curves(WORK_OVERTONES)[0]) * upper
    return rasp + np.sqrt(2) * note


def scene():
    """Superposition of sources in three moments, one straight after another: repair, start, mowing."""
    lawn, mowing = (np.clip((T - s) / 0.0031, 0, 1) for s in (LAWN_S, MOWING_S))
    turns = crank_turns()
    start = hum() + starter(turns) + dragging(turns) + knocking(turns)
    start = start + idle(turns) + flare(turns) + firings(turns)
    add(start, COUGH_S, ring(COUGH_MODES))  # the first pull over the top of the stroke
    work = (working_engine() + cutting_line() + flung_bits()) * amp([[.2], [-.2]])
    repair = (1 - lawn) * clutch()
    starting = (lawn - mowing) * widened(start, START_WIDTH)
    return repair + starting + mowing * widened(work, WORK_WIDTH) + background_air(lawn)


def record(dry, low_cut_hz=42):
    """High-pass, saturation and low-pass: the microphone sheds deep bass and clips peaks; then the band limit."""
    lean = signal.sosfilt(signal.butter(2, low_cut_hz, "high", fs=SR, output="sos"), dry)
    band_limit = signal.firwin(401, EDGE_HZ, window=("kaiser", 8), fs=SR)
    return signal.oaconvolve(np.clip(lean, -.8, .8), band_limit[None], "same")


dry = scene()
out = record(dry)
transcribe(out)
```